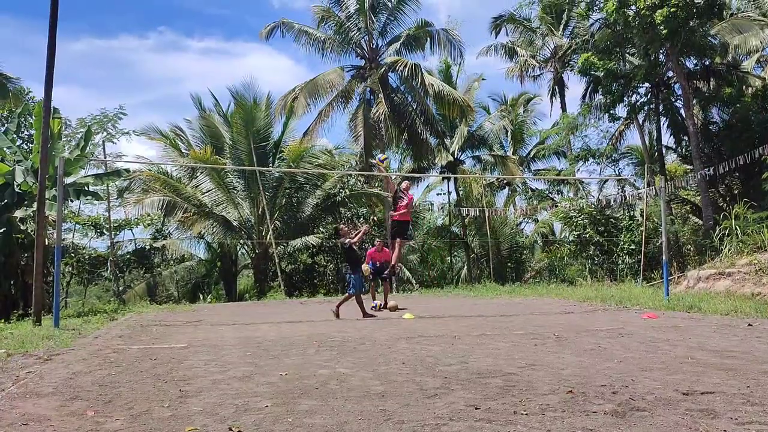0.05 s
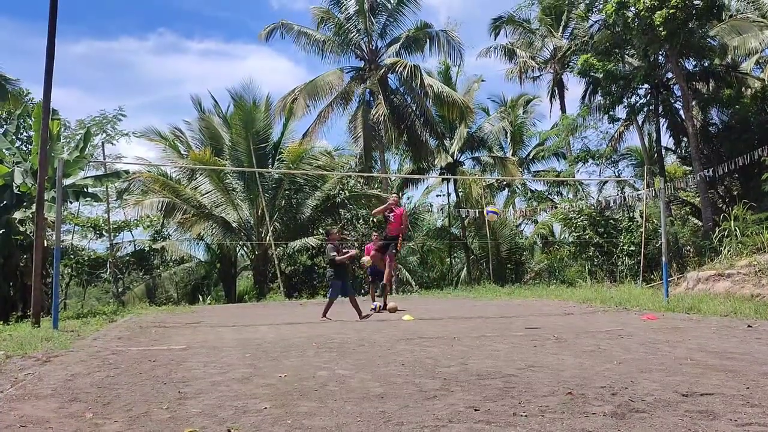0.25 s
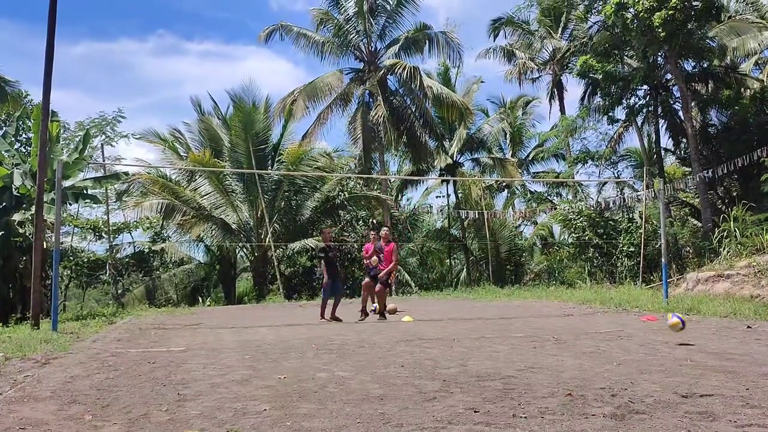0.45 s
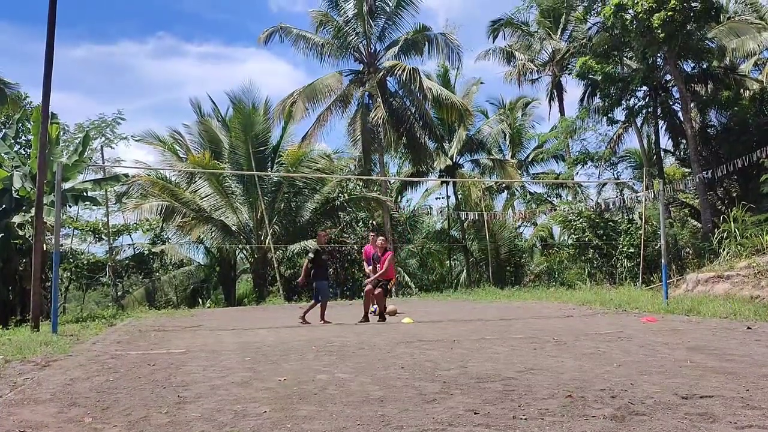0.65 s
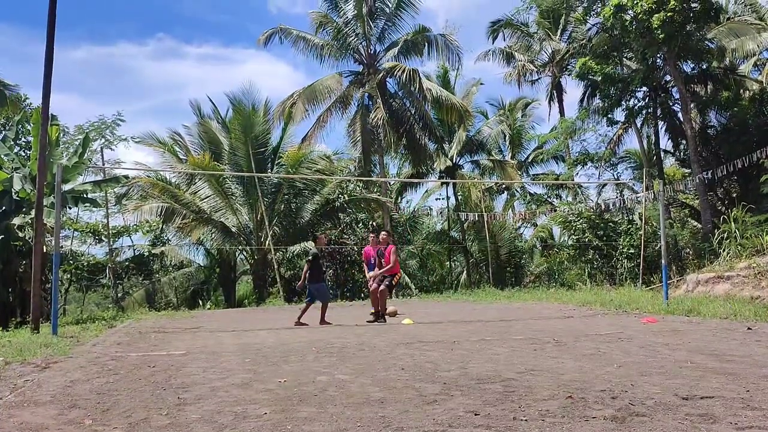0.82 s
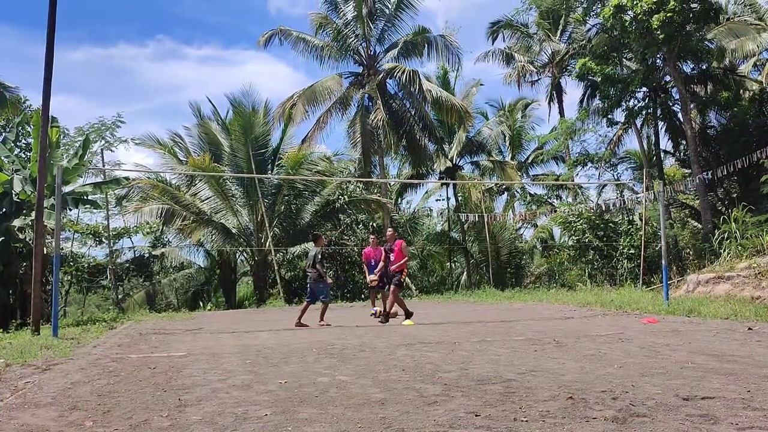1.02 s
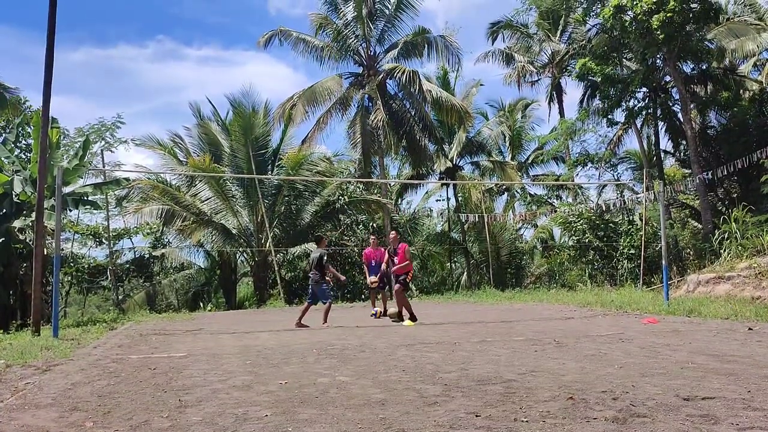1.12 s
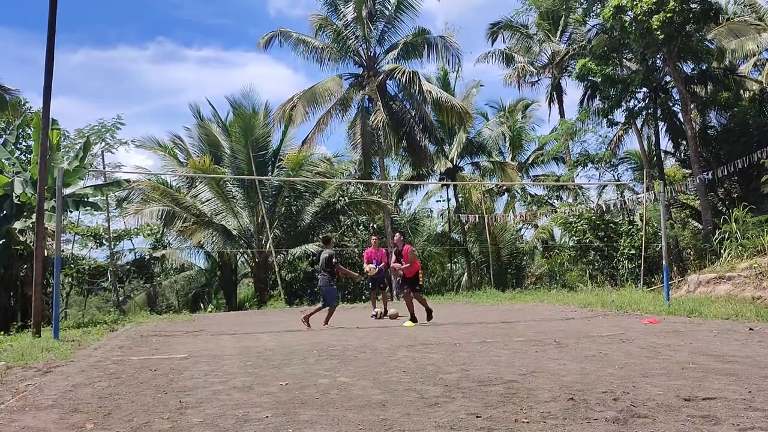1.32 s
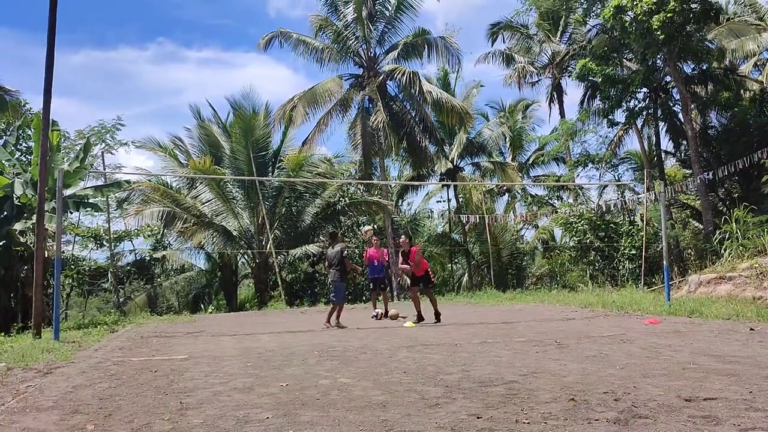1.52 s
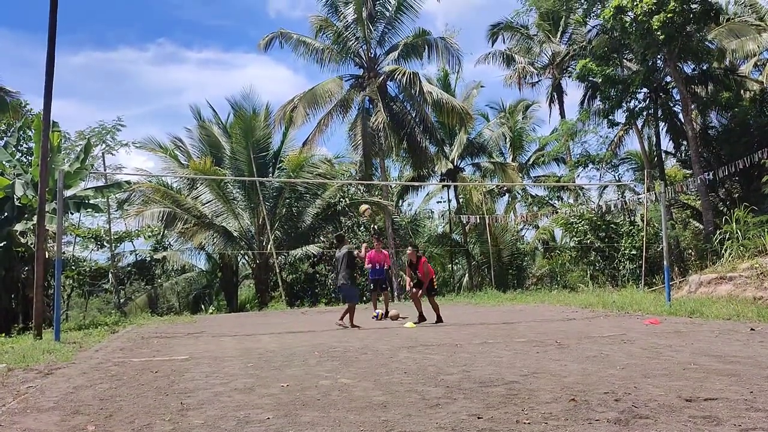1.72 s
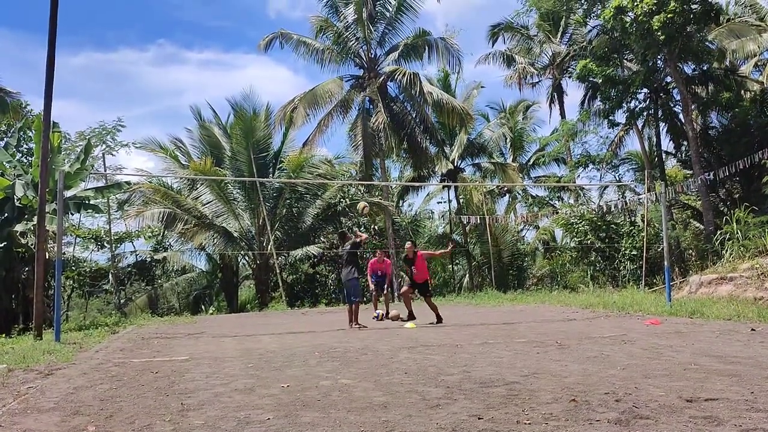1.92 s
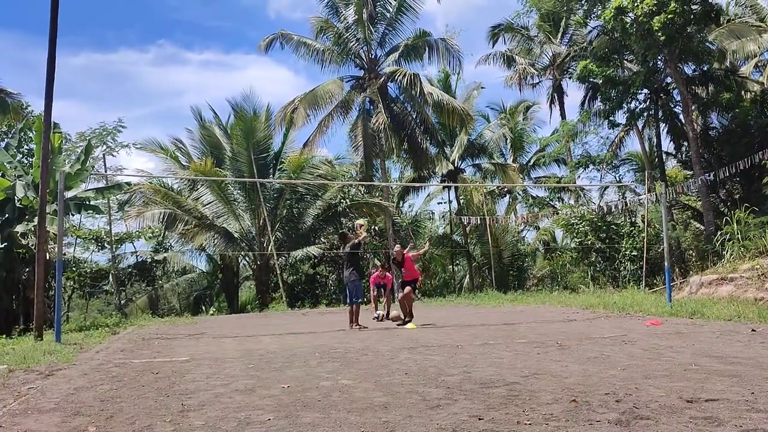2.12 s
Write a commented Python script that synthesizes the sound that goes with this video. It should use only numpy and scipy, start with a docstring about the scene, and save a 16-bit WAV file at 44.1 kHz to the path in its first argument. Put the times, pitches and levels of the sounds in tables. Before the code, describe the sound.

A hard volleyball hit cracks and echoes off trees, then bounces, over faint insect shrill

```python
"""An insect shrills from the right (stroke-pulsed sines) over soft outdoor rumble and leaf hiss (banded noise).
A volleyball is spiked, bounces on packed earth and is set again; ball and foot blows fall at 0.20, 0.44, 0.59
and 1.85 s: pumped air, ringing modes and noise slaps, scattered back by trees (decaying noise).
Feet land and shuffle throughout (filtered clicks). A far bird chirps at 0.94 s (an arched sine);
a faint hum (three harmonics) swells from 1.05 to 1.33 s."""
import sys
import numpy as np
from scipy import signal
from scipy.io import wavfile

SR = 44100
rng = np.random.default_rng(int(sys.argv[2]) if len(sys.argv) > 2 else 0)


def log_audio(samples):
    """Write samples as a 16-bit WAV file to the path given in sys.argv[1]."""
    # one column per channel
    frames = np.atleast_2d(samples).T
    # limit to full scale, then quantise
    limited = np.clip(frames, -1, 1)
    pcm = np.round(limited * 32767).astype(np.int16)
    wavfile.write(sys.argv[1], SR, pcm)


def ratio_of_db(decibels):
    """Turn decibels (scalar or array-like) into linear amplitude factors; 0 dB maps to 1."""
    return 10 ** (np.asarray(decibels, float) / 20)


N = 94815
FAR_LEFT_LAG_S = .0004   # insect and air


def rms_one(x):
    """Scales to rms 1."""
    return x / np.sqrt(np.mean(x ** 2) + 1e-20)


def at_hz(points, hz, axis=1):
    """Reads a table column on a log frequency axis."""
    points = np.array(points)
    return np.interp(np.log(hz), np.log(points[:, 0]), points[:, axis])


def drift(rate_hz):
    """Slow chance of rms 1: two-pole lowpassed noise, made at SR / 40."""
    r = np.exp(-80 * np.pi * rate_hz / SR)
    white = rng.standard_normal(N // 40 + 2002)
    slow = signal.lfilter([1], [1, -2 * r, r * r], white)[2000:]
    return np.interp(np.arange(N) / 40, np.arange(len(slow)), rms_one(slow))


def cut(x, hz, kind, order=2):
    """Butterworth filter."""
    return signal.sosfilt(signal.butter(order, hz, kind, fs=SR, output="sos"), x)


def around(x, hz, ratio, order=2):
    """Bandpass from hz / ratio to hz * ratio."""
    return cut(x, [hz / ratio, hz * ratio], "band", order)


def ring(x, hz, t60_s):
    """Two-pole resonator: a unit click sets a decaying sine ringing."""
    r, w = ratio_of_db(-60 / (t60_s * SR)), 2 * np.pi * hz / SR
    return signal.lfilter([0, np.sin(w)], [1, -2 * r * np.cos(w), r * r], x + 1e-18)


def swell(start_s, length_s):
    """A smooth sine-squared rise and fall."""
    return np.sin(np.pi * np.clip((np.arange(N) / SR - start_s) / length_s, 0, 1)) ** 2


def pair(left, right, left_lag_s):
    """The left side hears later."""
    return np.array([np.roll(left, int(left_lag_s * SR + .5)), right])


def bands(size):
    """Half-octave bands of two-channel noise; neighbouring bands use unrelated noises."""
    edges_hz = 22 * 2 ** np.arange(0, 9.6, .5)
    white = rng.standard_normal((2, 2, size))
    for k, (low, high) in enumerate(zip(edges_hz, edges_hz[1:])):
        yield np.sqrt(low * high), cut(white[k % 2], [low, high], "band")


TOUCH_RISE_S = 0.00028
REBOUND_SHARE, REBOUND_DB = 0.547, -11.5   # swing-back period per contact, its level
REBOUND_END = 1.75   # end of the pump/cycles
RING_REACH = 2.79    # lowpass of the ring's clicks, as a multiple of the sharpness
MODE_SPREAD_DB = 1.5
# ball and foot blows: t/s, contact/s, thump level/dB, lean/-1..1 towards lift-off, touch ring level/dB,
# lift-off ring level/dB, sharpness f/Hz, left lag/s, scattered ring level/dB
BLOWS = [(0.1993, .0080, -14, 0.37, -30.5, -22.5, 900, 0.000044, 20.5),
         (0.4438, 0.00633, -24, -0.26, -35.5, -37, 680, 0.00021, -8),
         (0.592, .0094, -14, 0.072, -27.5, -33.5, 1300, 0.00017, 18.5),
         (1.8473, 0.0091, -22.5, -0.76, -42, -38.5, 580, 0.00039, -10)]
# shell and air modes of the ball: f/Hz, level/dB re the clicks, t60/s
BALL_MODES = [(509.5, -11, 0.13), (777, 3, 0.017), (900, -5.5, 0.033), (1300, 2.5, 0.017), (1610, 0, 0.011),
              (1886, -23, 0.069), (2107, -4.5, 0.059), (2560, -2, 0.034), (3246, 1, 0.018)]


def blows():
    """Squeezed ball pumps air for one contact and swings back; touch and lift-off clicks ring its modes.
    Also returns the pushes with bare clicks, for the trees to scatter."""
    out, bare = np.zeros((2, N)), np.zeros((2, N))
    t = np.arange(SR // 4) / SR
    for start_s, contact_s, thump_db, lean, touch_db, lift_db, sharp_hz, left_lag_s, scatter_db in BLOWS:
        held = t < contact_s
        phase = np.where(held, t / contact_s, 1 + (t / contact_s - 1) / REBOUND_SHARE)   # cycles
        squeeze = 1 + lean * (2 * phase - 1)
        rebound = (1 + lean) * ratio_of_db(REBOUND_DB * np.clip(4 * (phase - 1), 0, 1))
        push = -np.cos(2 * np.pi * phase) * np.where(held, squeeze, rebound)
        push = push * (1 - np.exp(-t / TOUCH_RISE_S)) * (phase < REBOUND_END)
        pump = ratio_of_db(thump_db) * cut(push, sharp_hz, "low")

        clicks = np.zeros(len(t))
        clicks[0] = -ratio_of_db(touch_db)
        clicks[int(contact_s * SR)] = ratio_of_db(lift_db)
        clicks = cut(clicks, RING_REACH * sharp_hz, "low", order=4)
        shell = np.zeros(len(t))
        for hz, db, t60_s in BALL_MODES:
            shell += ratio_of_db(db + MODE_SPREAD_DB * rng.standard_normal()) * ring(clicks, hz, t60_s)

        i = int(start_s * SR)
        out[:, i:i + len(t)] += pair(pump + shell, pump + shell, left_lag_s)
        bare[:, i:i + len(t)] += pump + ratio_of_db(scatter_db) * cut(clicks, BALL_MODES[0][0], "high")
    return out, bare


SLAP_T60_S, SLAP_RISE_S = 0.019, 0.00075
SLAP_CLICK_DB, SCATTER_SLAP_DB = 9.5, 9
# skin slaps: t/s, level/dB, centre f/Hz, band edge/ratio, left lag/s
SLAPS = [(0.1987, -6.5, 4150, 1.36, .0001), (0.1981, -24.5, 8000, 1.33, .0001),
         (0.443, -15, 4540, 1.29, .0001), (0.593, -19, 2700, 1.19, .0003),
         (0.5937, -29.5, 5000, 1.39, .0003)]


def slaps():
    """Skin slap: one click at first touch, then a decaying noise burst, bandpassed.
    Also returns bandpassed clicks for the trees to scatter."""
    out, bare = np.zeros((2, N)), np.zeros((2, N))
    t = np.arange(SR // 4) / SR
    click = t == 0
    for start_s, db, hz, ratio, left_lag_s in SLAPS:
        burst = rng.standard_normal(len(t)) * (1 - np.exp(-t / SLAP_RISE_S)) * ratio_of_db(-60 * t / SLAP_T60_S)
        slap = ratio_of_db(db) * around(burst - ratio_of_db(SLAP_CLICK_DB) * click, hz, ratio)
        i = int(start_s * SR)
        out[:, i:i + len(t)] += pair(slap, slap, left_lag_s)
        bare[:, i:i + len(t)] += around(ratio_of_db(db + SCATTER_SLAP_DB) * click, hz, ratio, order=1)
    return out, bare


SCATTER_DB, SCATTER_RISE_S = -16, 0.0013
ECHO_CUT_HZ = 1170
# scatter from the trees: f/Hz, level/dB re SCATTER_DB, t60/s
TREES = [(101, -41.5, 0.43), (278, -27.5, 0.17), (800, -14.5, 0.83), (2160, -10, 0.48), (5000, -15.5, 0.58),
         (8000, -9.5, 0.37), (13000, -40, 0.9)]
# slow echoes of the ground and the bank: delay/s, level/dB
ECHOES = [(.026, -16), (0.045, -20)]


def trees(bare):
    """Scattered sound dying band by band, plus dull single echoes of the ground and the bank."""
    t = np.arange(int(.8 * SR)) / SR
    scatter = np.zeros((2, len(t)))
    for hz, noise in bands(len(t)):
        scatter += noise * ratio_of_db(at_hz(TREES, hz) - 60 * t / at_hz(TREES, hz, axis=2))
    scatter *= ratio_of_db(SCATTER_DB) * np.clip(t / SCATTER_RISE_S, 0, 1)
    out = signal.fftconvolve(bare, scatter, axes=1)[:, :N]
    dull = cut(bare, ECHO_CUT_HZ, "low")
    for delay_s, db in ECHOES:
        out += ratio_of_db(db) * np.roll(dull, int(delay_s * SR), axis=1)
    return out


GRIT_PER_S, GRIT_SPREAD_DB = 14000, .8
# feet scuffing the earth: t/s, length/s, level/dB, centre f/Hz, band edge/ratio
SCUFFS = [(0.168, 0.013, -60, 1200, 1.4), (0.419, 0.087, -55, 2600, 1.1), (0.448, 0.1, -51.5, 590, 1.4),
          (0.573, 0.042, -38, 620, 1.34), (1.108, 0.046, -61, 607, 1.57), (1.316, 0.042, -62.5, 4930, 1.4),
          (1.332, .1, -64.5, 800, 1.4), (1.463, 0.36, -59, 800, 1.74), (1.606, 0.17, -57.5, 3240, 1.39),
          (1.82, 0.25, -59.5, 3930, 1.56), (1.842, 0.3, -62.5, 900, 2.54)]


def scuffs():
    """Grit under the soles: dense uneven clicks through a broad resonance."""
    grit = rng.standard_normal((2, N)) * ratio_of_db(GRIT_SPREAD_DB * rng.exponential(1, N))
    grit = grit * (rng.random(N) < GRIT_PER_S / SR)
    grit = grit[0] + .5 * grit   # partly shared by both sides
    out = np.zeros((2, N))
    for start_s, length_s, db, hz, ratio in SCUFFS:
        out += ratio_of_db(db) * swell(start_s, length_s) * rms_one(around(grit, hz, ratio))
    return out


STROKE_DIVISOR = 77   # top-line cycles per stroke
STROKE_SHARPNESS, STROKE_BEND_RAD = .7, 0.56
INSECT_ROUGH, INSECT_WANDER_RAD = .4, .4
INSECT_FLICKER_DB, UNDER_FLICKER_DB = 1.2, 2.5
# pitch of the shrill top line: t/s, f/Hz
INSECT_PITCH = [(0, 13890), (.2, 13860), (.5, 13810), (.8, 13770), (.9, 13800), (1.2, 13865), (1.45, 13915),
                (1.7, 13875), (1.9, 13827), (2.15, 13802)]
# top line: t/s, level/dB
INSECT_LEVEL = [(0, -54), (.17, -59), (.25, -56), (.57, -61), (.85, -59), (1.25, -55), (1.3, -59.5),
                (1.6, -59), (1.68, -59), (1.72, -53.5), (1.89, -52), (1.92, -60), (1.97, -51.5),
                (2.15, -54)]
# lower tones: pitch as shares of the top line
UNDER_SHARES = (.25, .5)
# lower tones: t/s, quarter-pitch level/dB, half-pitch level/dB
UNDERTONES = [(0, -68, -74.5), (.2, -61.5, -71), (.5, -60.5, -73), (.9, -67, -77.5), (1.2, -65.5, -79),
              (1.5, -66, -82), (1.748, -62.5, -72), (2.15, -57, -74.5)]


def insect_roughness():
    """Two-channel lowpassed noise around 1."""
    return 1 + INSECT_ROUGH * rms_one(cut(rng.standard_normal((2, N)), 300, "low"))


def insect():
    """Shrill tone and lower tones, pulsed by quick regular strokes that also bend the top line's phase."""
    t = np.arange(N) / SR
    turn = 2 * np.pi * np.cumsum(np.interp(t, *np.transpose(INSECT_PITCH))) / SR
    stroke_turn = turn / STROKE_DIVISOR
    strokes = rms_one(np.exp(STROKE_SHARPNESS * np.cos(stroke_turn)))

    level = ratio_of_db(np.interp(t, *np.transpose(INSECT_LEVEL)) + INSECT_FLICKER_DB * drift(8.7))
    phase = turn + STROKE_BEND_RAD * np.sin(stroke_turn) + INSECT_WANDER_RAD * drift(25)
    out = level * strokes * insect_roughness() * np.sin(phase)

    under_s, *under_levels = np.transpose(UNDERTONES)
    for share, db in zip(UNDER_SHARES, under_levels):
        level = ratio_of_db(np.interp(t, under_s, db) + UNDER_FLICKER_DB * drift(16))
        pulse = (1 + 0.59 * strokes) * (1 + insect_roughness()) / 2
        out += level * pulse * np.sin(share * turn + INSECT_WANDER_RAD * drift(40))
    return pair(*out, FAR_LEFT_LAG_S)


# far bird: t/s, length/s, base f/Hz, rise f/Hz, level/dB
CHIRP = (.935, .05, 4050, 250, -61)


def bird():
    """One far chirp: pitch and level follow the same arch."""
    start_s, length_s, hz, rise_hz, db = CHIRP
    arch = swell(start_s, length_s)
    return ratio_of_db(db) * arch * np.sin(2 * np.pi * np.cumsum(hz + rise_hz * arch) / SR)


HUM_START_S, HUM_LENGTH_S, HUM_BASE_HZ = 1.046, 0.28, 99.8
# hum harmonics: f/multiple of base, level/dB
HUM = [(2, -51.5), (3, -65), (4, -63.5)]


def hum():
    """Harmonic sines under one swell."""
    t = np.arange(N) / SR
    tones = sum(ratio_of_db(db) * np.sin(2 * np.pi * k * HUM_BASE_HZ * t) for k, db in HUM)
    return swell(HUM_START_S, HUM_LENGTH_S) * tones


AIR_RMS_DB, AIR_PATCHY_DB = -45.5, 1.0
# rumble and leaf hiss: f/Hz, relative level/dB
AIR = [(22, 5), (40, 11.5), (60, -3), (110, 2.5), (200, -8.5), (400, -18.5), (1000, -25), (1600, -29),
       (3000, -25), (5000, -30.5), (7000, -35.5), (8500, -49.5), (11000, -44.5), (13500, -36)]
# left-right likeness of the air: f/Hz, likeness/0..1
LIKENESS = [(60, 0.87), (290, 1), (700, 0.23), (1500, 0.88), (4000, 0.067), (12000, 0.11)]


def air():
    """Rumble and leaf hiss: noise bands, each flickering on its own and slightly together."""
    left = right = 0
    together = drift(0.51)
    for hz, (mid, side) in bands(N):
        alike = np.clip(at_hz(LIKENESS, hz), 0, 1)
        gain = ratio_of_db(at_hz(AIR, hz) + AIR_PATCHY_DB * (0.2 * together + drift(8.7)))
        shared, apart = np.sqrt(1 + alike) * mid, np.sqrt(1 - alike) * side
        left = left + gain * (shared + apart)
        right = right + gain * (shared - apart)
    return ratio_of_db(AIR_RMS_DB) * rms_one(pair(left, right, FAR_LEFT_LAG_S))


def scene():
    """Sums all sources; the trees answer blows and slaps."""
    hits, bare_hits = blows()
    skin, bare_skin = slaps()
    near = hits + skin + trees(bare_hits + bare_skin) + scuffs()
    return near + insect() + bird() + hum() + air()


def band_limit(x):
    """A steep low-pass at the top of the band."""
    return signal.sosfilt(signal.butter(12, 15460, fs=SR, output="sos"), x)


MIC_LOW_HZ, MIC_LOW_Q = 72.2, 0.92
MIC_TOP_HZ = 14270
SHADOW_HZ, SHADOW_DB = 1670, -9


def record(dry):
    """Microphones: resonant highpass with a slight bump, left treble shaded, steep top cutoff."""
    w = 2 * np.pi * MIC_LOW_HZ / SR
    a = np.sin(w) / (2 * MIC_LOW_Q)
    highpass = (1 + np.cos(w)) / 2 * np.array([1, -2, 1])
    left, right = signal.lfilter(highpass, [1 + a, -2 * np.cos(w), 1 - a], dry)
    bass = cut(left, SHADOW_HZ, "low", order=1)
    mix = np.array([bass + ratio_of_db(SHADOW_DB) * (left - bass), right])
    mix = signal.sosfilt(signal.ellip(8, .5, 38, MIC_TOP_HZ, fs=SR, output="sos"), mix)
    return band_limit(mix)


dry = scene()
out = record(dry)
log_audio(out)
```